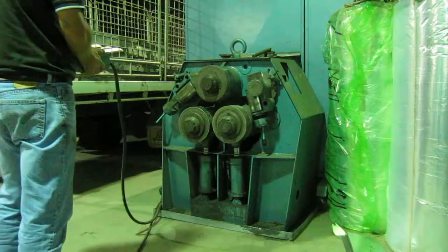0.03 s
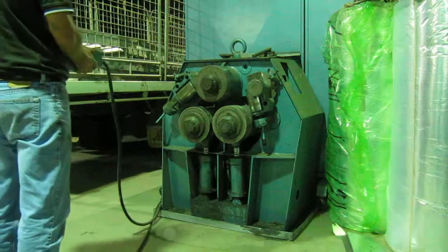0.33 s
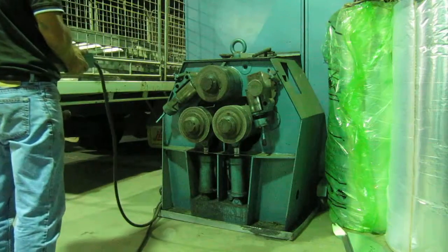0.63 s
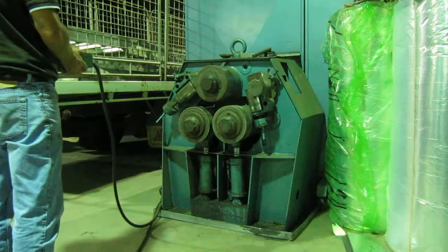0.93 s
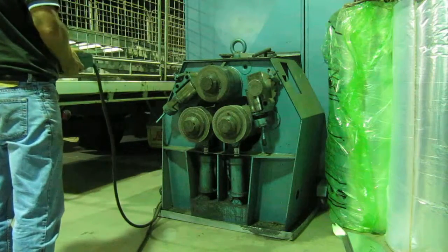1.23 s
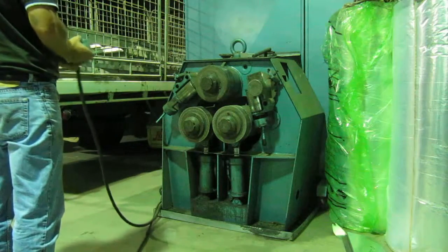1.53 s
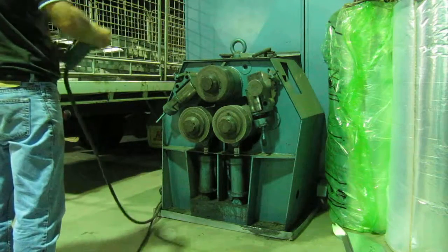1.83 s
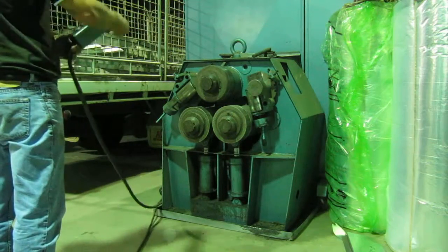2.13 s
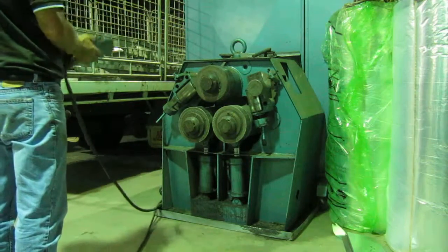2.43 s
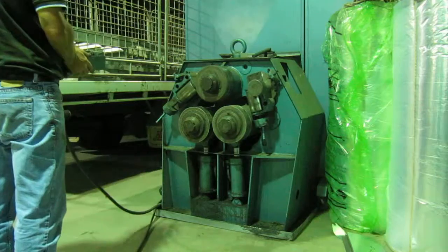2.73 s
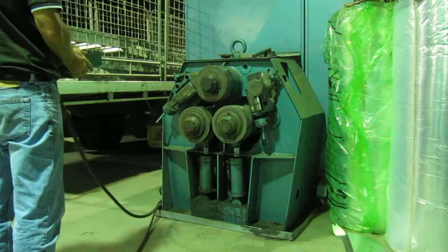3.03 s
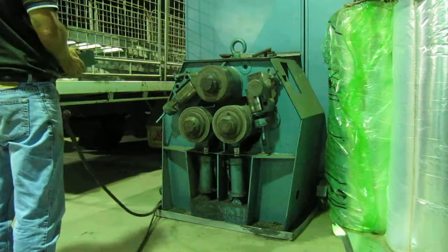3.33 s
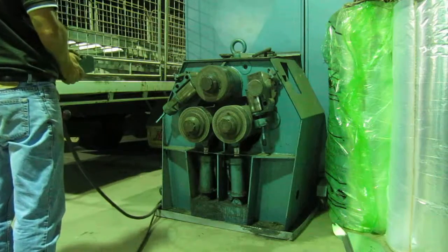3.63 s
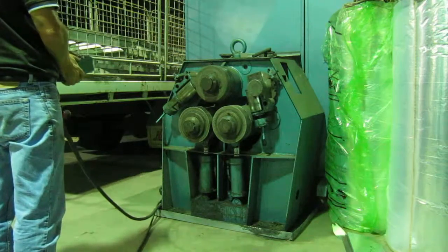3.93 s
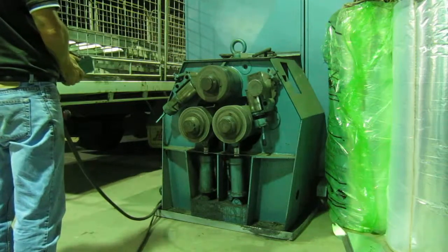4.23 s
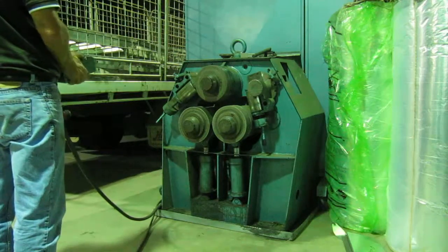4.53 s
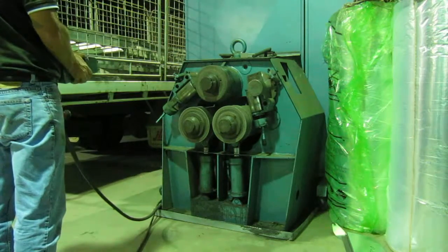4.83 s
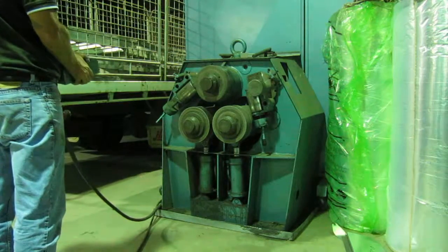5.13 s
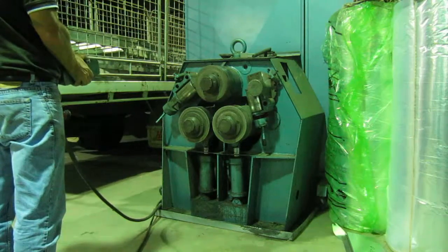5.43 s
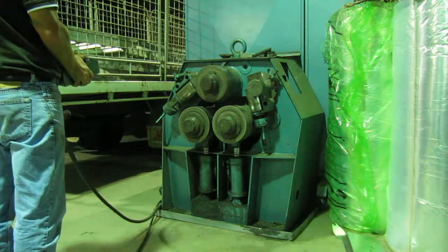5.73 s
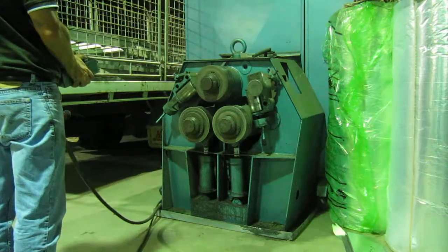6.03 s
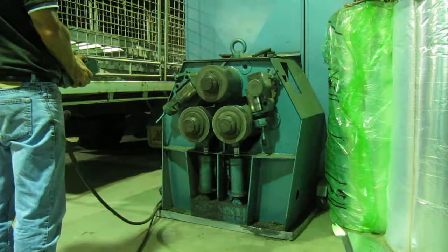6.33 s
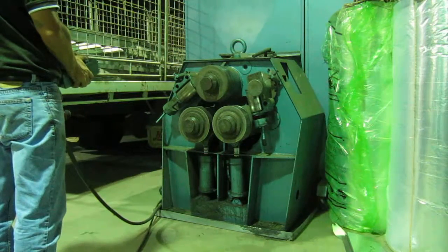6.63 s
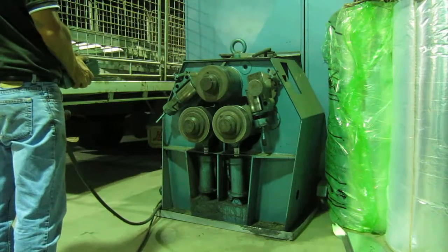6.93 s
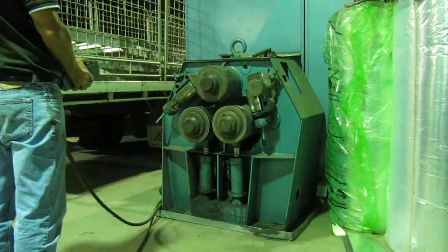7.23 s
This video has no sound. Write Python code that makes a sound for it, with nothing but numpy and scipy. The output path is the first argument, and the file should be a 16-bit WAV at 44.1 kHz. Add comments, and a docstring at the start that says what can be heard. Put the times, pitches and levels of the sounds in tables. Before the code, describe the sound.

A workshop machine's pump hums and rattles; its motor switches on twice with loud steel clunks, an electric buzz and a gear whirr.

```python
"""A rattling hum that repeats with each shaft turn: the hydraulic pump of a section bending machine,
idling throughout, heard from one microphone in the workshop. A pendant rustles faintly in the hand.
The operator switches the drive on: a steel clunk, a mains buzz with a gear whirr, a clunk as it drops
out, then one short jog. The heavy frame booms after every blow, and the camera's gain control ducks
behind the loud ones. Fan and room air lie underneath."""
import sys
import numpy as np
from scipy import signal
from scipy.fft import rfft, irfft
from scipy.io import wavfile
from scipy.ndimage import uniform_filter1d

SR = 44100
rng = np.random.default_rng(int(sys.argv[2]) if len(sys.argv) > 2 else 0)


def master_out(mix):
    """Clip the mix to full scale and print it as 16-bit PCM to the path in sys.argv[1]."""
    frames = np.transpose(np.atleast_2d(mix))
    ceiling = np.clip(frames, -1, 1)
    pcm = np.round(ceiling * 32767).astype(np.int16)
    wavfile.write(sys.argv[1], SR, pcm)


N = 321048

SHAFT_HZ, MAINS_HZ = 24.618, 49.975
# runs of the drive: on_s, off_s, buzz_db, whirr_db, chatter_db
RUNS = [(4.093, 5.803, 1.2, -1.2, 5), (6.72, 6.981, -.5, -4, 11)]


def pump(drift=0.23, flutter=0.08, wander_turns=0.00025):
    """Every shaft turn repeats the same clatter; its lines drift slowly in strength."""
    t = seconds()
    gains = pump_harmonics()
    cycle = pump_turn(gains)
    turns = SHAFT_HZ * t + wander_turns * walk(2.95)
    # reflections shift as the operator moves about
    reflections = sum(share * walk(rate_hz) * repeat(one_cycle(gains), turns)
                      for share, rate_hz in [(drift, .6), (drift, 1.1), (flutter, 9)])
    return pump_effort(t) * (repeat(cycle, turns) + reflections)


def pump_harmonics(scatter_db=3.5, even_db=1.3, count=620):
    """Gains of the shaft's harmonics: strong lines and bearing whine over an uneven clatter."""
    # the pump's strongest lines: shaft_multiple, level_db
    strong_lines = [(6, -55), (8, -59), (16, -60), (18, -56.5), (22, -56.5), (23, -54.5), (32, -54.5),
                    (40, -53.5), (52, -61), (53, -49.5), (54, -53.5), (55, -56), (59, -48), (61, -56.5),
                    (63, -48.5), (66, -49.5), (67, -47.5), (68, -48), (69, -47.5), (71, -46.5), (72, -47.5),
                    (73, -57.5), (75, -49.5), (77, -52), (78, -47), (83, -57), (84, -51), (86, -51.5),
                    (87, -47), (93, -53)]
    # fine bearing whine: shaft_multiple, level_db
    whine_lines = [(124, -63), (136, -54.5), (142, -65), (152, -62), (173, -75), (175, -76), (179, -67),
                   (201, -68), (203, -69.5), (209, -69), (213, -69), (221, -68.5), (260, -79), (262, -67.5),
                   (264, -91), (276, -83), (278, -72), (302, -72), (373, -73), (382, -83), (402, -70)]
    # outline of the other lines: pitch_hz, level_db
    clatter_spectrum = [(100, -81), (270, -67), (450, -56), (680, -64), (950, -59), (1120, -62),
                        (1400, -59.5), (1900, -57), (2350, -57.5), (2750, -69), (3500, -63), (3850, -65),
                        (4400, -88.5), (10000, -80), (12000, -102)]
    k = np.arange(1, count + 1)
    uneven_db = scatter_db * (rng.standard_normal(count) - 0.5) + even_db * (-1) ** k
    clatter = spectrum_at(k * SHAFT_HZ, clatter_spectrum) * undb(uneven_db)
    return harmonics([*strong_lines, *whine_lines], clatter)


def pump_turn(gains, stroke_db=0.9, knock_hz=1690, knock_width_hz=85, knock_share=0.68):
    """One turn of the shaft, with two pressure strokes and one knock in the casing."""
    k = np.arange(1, len(gains) + 1)
    cycle = one_cycle(gains)
    size = len(cycle)
    angle = 2 * np.pi * np.arange(size) / size
    # the strokes set when in the turn each line peaks
    phases = np.angle(rfft(cycle * undb(stroke_db * np.cos(2 * angle))))[k]
    # lines near the casing's resonance peak together
    phases *= 1 - knock_share * np.exp(-((k * SHAFT_HZ - knock_hz) / knock_width_hz) ** 2)
    return irfft(np.r_[0, gains * np.exp(1j * phases)], size) * size / np.sqrt(2)


def pump_effort(t, idle_db=-0.1, loaded_db=1.5, lag_s=1.5):
    """The pump's gain: oil pressure builds while the drive runs and bleeds away afterwards."""
    demand = sum(powered(t, on, off) for on, off, *_ in RUNS)
    step = 1 / (lag_s * SR)
    pressure = signal.lfilter([step], [1, step - 1], demand)
    return undb(idle_db + (loaded_db - idle_db) * pressure)


def drive():
    """The drive under power: iron buzzes, covers rattle, the gear whirrs and the armature ticks."""
    t = seconds()
    buzz_gain, whirr_gain, chatter_gain = drive_levels(t)
    pull = np.cos(2 * np.pi * 2 * MAINS_HZ * t)
    buzz = iron_buzz(t)
    covers = cover_rattle(t, pull)
    whirr = whirr_gain * gear_whirr(buzz_gain * pull)
    return buzz_gain * (buzz + covers) + hall_hang(buzz, t) + whirr + chatter_gain * armature(t)


def drive_levels(t, coast_db=-5, coast_db_per_s=9, seat_db_per_s=15,
                 scrape_whirr_db=8.5, scrape_chatter_db=10):
    """Gains of buzz, whirr and armature chatter as the drive pulls in, runs, drops out and coasts."""
    buzz = whirr = chatter = 0
    for on, off, buzz_db, whirr_db, chatter_db in RUNS:
        current = powered(t, on, off)
        # with the power off the whirr drops a step, then the gear coasts down
        coasting = (t > off) * (1 - current) * undb(coast_db - coast_db_per_s * np.maximum(t - off, 0))
        turning = undb(whirr_db) * (current + coasting)
        # the armature chatters less as it seats
        seating = undb(chatter_db - seat_db_per_s * np.maximum(t - on, 0)) * current
        # gear and armature scrape briefly as the drive drops out
        scrape = np.exp(-.5 * ((t - off + 0.013) / 0.018) ** 2)
        buzz = buzz + undb(buzz_db) * current
        whirr = np.maximum(whirr, np.maximum(turning, undb(scrape_whirr_db) * scrape))
        chatter = chatter + np.maximum(seating, undb(scrape_chatter_db) * scrape)
    return buzz, whirr, chatter


def powered(t, on, off, attack_s=0.013, release_db_per_s=252):
    """The current in one run: it builds at once, holds, and dies quickly when cut."""
    return np.clip((t - on) / attack_s, 0, 1) * undb(-release_db_per_s * np.maximum(t - off, 0))


def iron_buzz(t, waver=0.15, floor_db=-65.5, count=40):
    """The drive's iron buzzes at twice the mains rate, wavering a little."""
    # lines of the buzz: multiple_of_twice_mains, level_db
    buzz_lines = [(2, -37.5), (3, -50), (4, -40.5), (5, -50), (7, -47), (8, -43.5), (9, -51.5), (10, -48.5),
                  (11, -53), (13, -49), (14, -47.5), (17, -45.2), (18, -52), (19, -41), (20, -47),
                  (21, -49.5), (22, -70), (23, -47), (24, -50.7), (26, -56), (34, -49.5), (40, -56.5)]
    gains = harmonics(buzz_lines, np.full(count, undb(floor_db)))
    pulls = 2 * MAINS_HZ * t
    return repeat(one_cycle(gains), pulls) + waver * walk(7) * repeat(one_cycle(gains), pulls)


def cover_rattle(t, pull, pulsing=0.51, looseness=0.46):
    """The buzz shakes the covers; the shaking partly repeats with every mains cycle."""
    # resonances of the covers: pitch_hz, width_hz, density_db
    cover_bands = [(6070, 130, -80), (6790, 75, -73), (8540, 146, -70), (9180, 470, -79), (11800, 200, -93),
                   (12500, 230, -91)]
    regular = repeat(rng.standard_normal(int(SR / MAINS_HZ)), MAINS_HZ * t)
    shake = regular + looseness * rng.standard_normal(N)
    return bands(shake * (1 + pulsing * pull), cover_bands)


def gear_whirr(pull, pulsing=0.12, flicker_db=1.2):
    """The turning gear whirrs through its housing, pulsing with the buzz."""
    # the whirr at full speed: pitch_hz, density_db
    whirr_spectrum = [(130, -76), (300, -68), (550, -69), (1100, -80.5), (1400, -67), (2000, -70.5),
                      (2700, -79.5), (3500, -75), (4800, -83), (6500, -79), (9500, -83.5), (11000, -88.5),
                      (13000, -101), (15000, -110)]
    # resonances of the gear housing: pitch_hz, width_hz, density_db
    housing_bands = [(983, 47, -61), (3394, 120, -74), (7940, 150, -74.5)]
    whirr = noise(whirr_spectrum) + bands(rng.standard_normal(N), housing_bands)
    return whirr * (1 + pulsing * pull) * undb(flicker_db * walk(17))


def armature(t, lag_cycles=.65, decay_cycles=0.42, uneven_db=0.5):
    """The switch's armature ticks once in every mains cycle."""
    # the tick: pitch_hz, density_db
    tick_spectrum = [(1000, -100), (4000, -72.5), (7000, -85), (9300, -73), (11000, -77.5), (12700, -84),
                     (15500, -101)]
    since_tick = (MAINS_HZ * t - lag_cycles) % 1
    envelope = np.exp(-since_tick / decay_cycles) / np.sqrt(2 * decay_cycles)
    return noise(tick_spectrum) * envelope * undb(-uneven_db * walk(40))


def blows(crack_db=14, near_db=3, near_t60_s=0.12, hall_db=-13, hall_t60_s=0.84,
          steel_db=-23, frame_db=-23, boom_db=2, boom_t60_s=0.65, swell_s=0.002):
    """Each blow cracks, scatters off the machine and the hall, rings the steel and booms the frame."""
    # blows of switchgear and drive: start_s, clack_db, thud_db, contact_s, thud_tilt_db_per_octave
    strikes = [(4.1026, 3.5, -2.5, 0.0045, 6), (4.1085, -0.5, -20, 0.0036, -1),
               (4.124, -4.5, -3, 0.0047, -1.5), (4.147, -9.5, -4.5, .008, -2),
               (5.765, -17.5, -7, .005, 3.5), (5.775, -16, -8, .006, 0), (5.786, -16.5, -7.5, 0.0028, 1.5),
               (5.801, -20, -16, 0.0058, -5), (5.828, -42, -9.5, .01, -5), (6.7247, 2.5, 0.5, 0.0056, 2),
               (6.7289, 1, -12, 0.0022, 0), (6.7565, -2.5, -0.5, .006, 6), (6.7914, -1, -7, 0.01, 6),
               (6.815, -11, -7.5, .008, 1), (6.842, -9.5, -4, 0.021, -7), (6.936, -17.5, -14, .008, 0),
               (6.9575, -20, -12, 0.0072, -12.5), (6.979, -18, -7, 0.005, -3.5)]
    # the crack of steel on steel: pitch_hz, density_db
    crack_spectrum = [(70, -74), (200, -48.5), (500, -60), (1100, -63.5), (1600, -58), (2400, -64),
                      (3100, -60.5), (4300, -54), (5400, -64), (7000, -61.5), (8700, -52), (9700, -56),
                      (11500, -68), (15500, -89)]
    # loose steel parts: pitch_hz, level_db, t60_s
    steel_modes = [(2100, -16, 0.38), (2915, -7.5, 0.33), (3460, -19, 0.28), (3903, 2.5, 0.16),
                   (4060, -14.5, 1), (4410, -13.5, 0.86), (4540, -11, 0.5), (7897, -16, 0.18),
                   (8430, -14, 0.27), (9000, -23, 0.31), (9300, -15, 0.24), (9700, -11, 0.27)]
    # the heavy frame: pitch_hz, level_db, t60_s
    frame_modes = [(131.2, -11.5, 0.93), (154.3, -7, 1.08), (190.1, -1.5, 1.09), (209, -5, 0.45),
                   (255, -6.5, 0.68), (343.5, -1.5, 0.82), (355.3, -0.5, 0.53), (476.4, -14.5, 0.7),
                   (564, -15.5, 0.66), (636, -15, 0.51), (712, -18.5, 0.94), (785, -15, 0.55)]
    # the hall's answer to a thud: pitch_hz, density_db
    boom_spectrum = [(40, -100), (115, -81), (160, -49), (350, -53.5), (500, -55.5), (800, -54.5),
                     (1200, -63), (3000, -67.5), (8000, -110)]
    out, t = np.zeros(N + 2 * SR), np.arange(SR) / SR
    near = undb(near_db) * fade(t, near_t60_s)
    hall = undb(hall_db) * fade(t, hall_t60_s)
    for start_s, clack_db, thud_db, contact_s, tilt_db in strikes:
        # a longer contact spreads the same energy over more time
        direct = undb(crack_db) * np.exp(-t / contact_s) * np.sqrt(0.0017 / contact_s)
        crack = noise(crack_spectrum, size=SR) * np.sqrt(direct ** 2 + near ** 2 + hall ** 2)
        steel = undb(steel_db) * ring(steel_modes, t, detune=0.0047)
        frame = undb(frame_db) * ring(frame_modes, t, tilt_db)
        boom = undb(boom_db) * noise(boom_spectrum, size=SR) * fade(t, boom_t60_s)
        clack = undb(clack_db) * (crack + steel) * (1 - np.exp(-10 * t / contact_s))
        thud = undb(thud_db) * (frame + boom) * (1 - np.exp(-t / swell_s))
        start = int(start_s * SR)
        out[start:start + SR] += clack + thud
    return out[:N]


def hall_hang(buzz, t, level_db=-1, fall_db_per_s=60, top_hz=450):
    """The buzz's low notes hang on in the hall after each run."""
    low = signal.sosfilt(signal.butter(2, top_hz, fs=SR, output="sos"), buzz)
    tails = 0
    for on, off, buzz_db, *_ in RUNS:
        released = (t > off) * (1 - powered(t, on, off))
        tails = tails + released * undb(buzz_db - fall_db_per_s * np.maximum(t - off, 0))
    return undb(level_db) * tails * low


def rustles(width_hz=4500):
    """Faint scuffs of cable and cloth as the pendant is handled."""
    # the scuffs: peak_s, level_db, spread_s, pitch_hz
    scuffs = [(0.122, -48, 0.016, 5500), (.125, -63, .015, 9500), (1.715, -55, .02, 9500),
              (2.188, -59, .02, 9500), (2.33, -52, 0.038, 8500)]
    out = np.zeros(N)
    for peak_s, db, spread_s, hz in scuffs:
        scuff = resonate(resonate(rng.standard_normal(N), hz, width_hz), hz, width_hz)
        envelope = np.exp(-.5 * ((seconds() - peak_s) / spread_s) ** 2)
        out += undb(db) * scuff / scuff.std() * envelope
    return out


def workshop_air(flicker_db=0.5):
    """Room tone: the workshop's rush and rumble, and a draught that sounds the fan's duct."""
    # fan and room air: pitch_hz, density_db
    air_spectrum = [(20, -86), (40, -71), (130, -77), (260, -85), (600, -86.5), (1050, -80), (1700, -73.5),
                    (2200, -79), (2700, -83.5), (3600, -81), (4400, -92.5), (9800, -98), (12000, -108),
                    (15500, -118)]
    # resonances of the duct: pitch_hz, width_hz, density_db
    duct_bands = [(769, 55, -70.5), (1300, 80, -69)]
    # the duct's tone swells once and stays: time_s, level_db
    swell = [(1.6, -7), (2.1, 1.5)]
    draught = undb(np.interp(seconds(), *np.transpose(swell)))
    duct = draught * bands(rng.standard_normal(N), duct_bands)
    return noise(air_spectrum) * undb(flicker_db * walk(15)) + duct


def undb(db):
    """Decibels to gain."""
    return 10 ** (np.asarray(db) / 20)


def seconds():
    """The time of every sample."""
    return np.arange(N) / SR


def fade(t, t60_s):
    """A decay that falls 60 dB in t60_s."""
    return np.exp(-np.log(1000) * t / t60_s)


def spectrum_at(hz, points):
    """Gain of a (pitch_hz, level_db) spectrum, straight on a log axis."""
    pitch_hz, db = np.transpose(points)
    return undb(np.interp(np.log(np.maximum(hz, 1)), np.log(pitch_hz), db))


def noise(points, size=N):
    """Noise with a (pitch_hz, density_db) spectrum; density is the level in a 1 Hz band."""
    hz = np.arange(size // 2 + 1) * SR / size
    return irfft(rfft(rng.standard_normal(size)) * spectrum_at(hz, points), size) * np.sqrt(SR / 2)


def resonate(x, hz, width_hz):
    """One resonance, gain 1 at its centre."""
    return signal.lfilter(*signal.iirpeak(min(hz, SR / 2 - 1), max(hz / width_hz, 1), SR), x)


def bands(x, resonances):
    """Unit noise through (pitch_hz, width_hz, density_db) resonances with steep skirts."""
    return sum(undb(db) * resonate(resonate(x, hz, 1.48 * width), hz, 1.48 * width)
               for hz, width, db in resonances) * np.sqrt(SR / 2)


def walk(rate_hz):
    """Random levels held 1 / rate_hz seconds and slewed twice; spread near 1."""
    hold = int(SR / rate_hz)
    steps = np.repeat(rng.standard_normal(N // hold + 1), hold)
    return np.sqrt(2) * uniform_filter1d(uniform_filter1d(steps, hold), hold)[:N]


def one_cycle(gains, size=8192):
    """One period with these rms harmonics and chance phases."""
    lines = gains * np.exp(2j * np.pi * rng.random(len(gains)))
    return irfft(np.r_[0, lines], size) * size / np.sqrt(2)


def repeat(cycle, turns):
    """Play one period round and round."""
    return np.interp(turns % 1 * len(cycle), np.arange(len(cycle) + 1), np.r_[cycle, cycle[0]])


def harmonics(lines, base):
    """A copy of the base gains with the listed (multiple, level_db) lines put in."""
    gains = np.array(base)
    for k, db in lines:
        gains[int(round(k)) - 1] = undb(db)
    return gains


def ring(modes, t, tilt_db=0, detune=0, pivot_hz=250):
    """Decaying modes; a hard blow favours the high ones, and loose parts land a little off pitch."""
    hz, db, t60_s = np.transpose(modes)[:, :, None]
    hz = hz * (1 + detune * rng.standard_normal(hz.shape))
    gain = undb(db + tilt_db * np.log2(hz / pivot_hz))
    return np.sum(gain * np.sin(2 * np.pi * hz * t) * fade(t, t60_s), axis=0)


def gain_control(x, threshold_db=-18, release_db_per_s=10.5, slope=0.74, window_s=0.0053):
    """The gain drops at once when the level passes a threshold and creeps back."""
    power = uniform_filter1d(x ** 2, int(window_s * SR))
    level_db = 10 * np.log10(np.maximum(power, 1e-12))
    duck_db = slope * np.maximum(level_db - threshold_db, 0)
    creep_db = release_db_per_s * seconds()
    return x * undb(creep_db - np.maximum.accumulate(duck_db + creep_db, axis=-1))


def scene():
    """Pump, room air, drive, blows and handling at one microphone in the workshop."""
    return (pump() + workshop_air() + drive() + blows() + rustles())[None]


def record(dry):
    """The camera rides its gain and cuts the top above 15.75 kHz."""
    low_pass = signal.ellip(10, .2, 70, 15750, fs=SR, output="sos")
    return signal.sosfilt(low_pass, gain_control(dry))


dry = scene()
out = record(dry)
master_out(out)
```